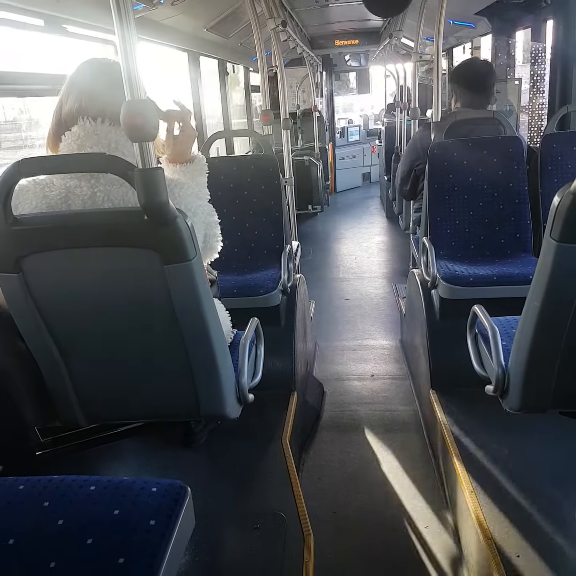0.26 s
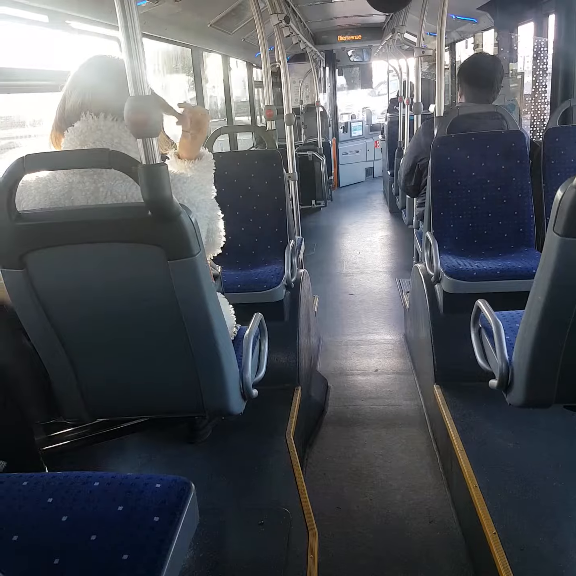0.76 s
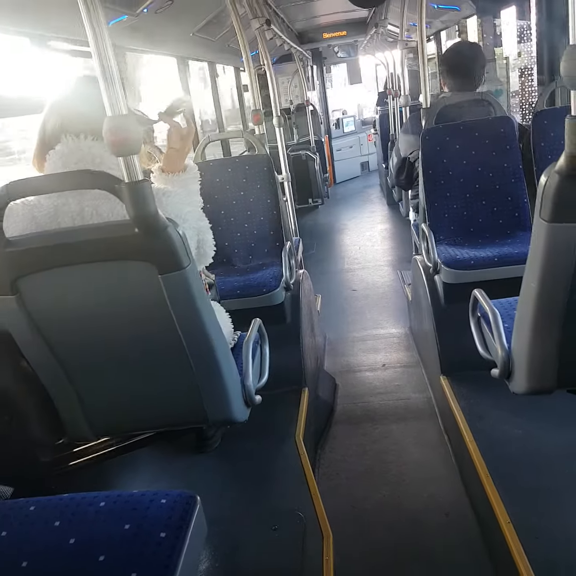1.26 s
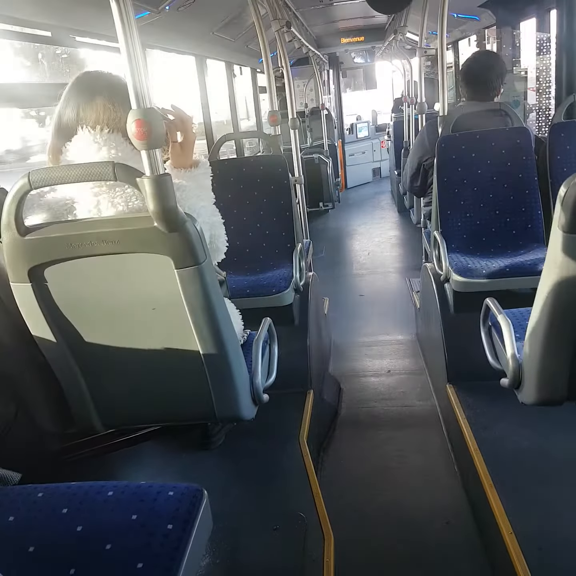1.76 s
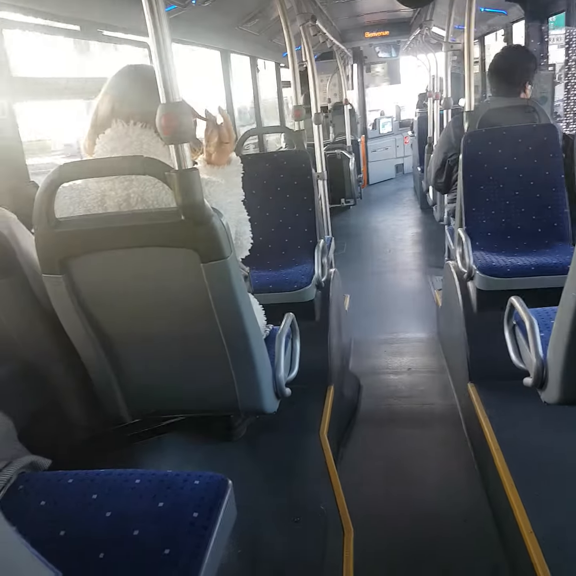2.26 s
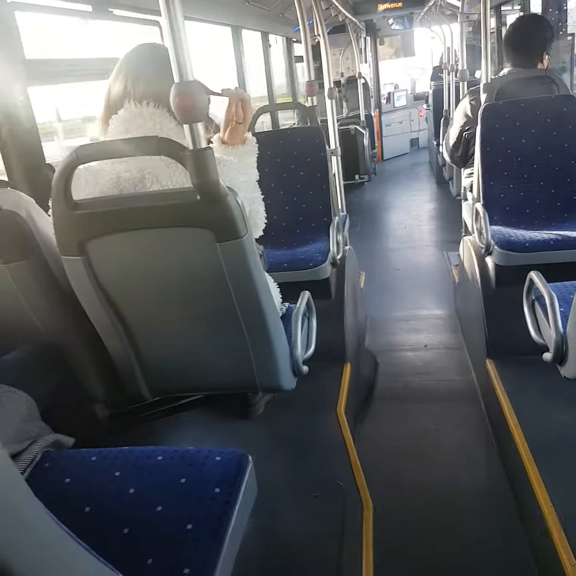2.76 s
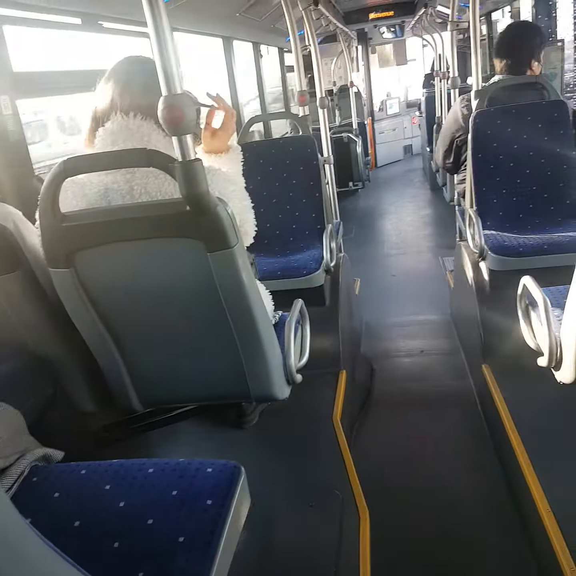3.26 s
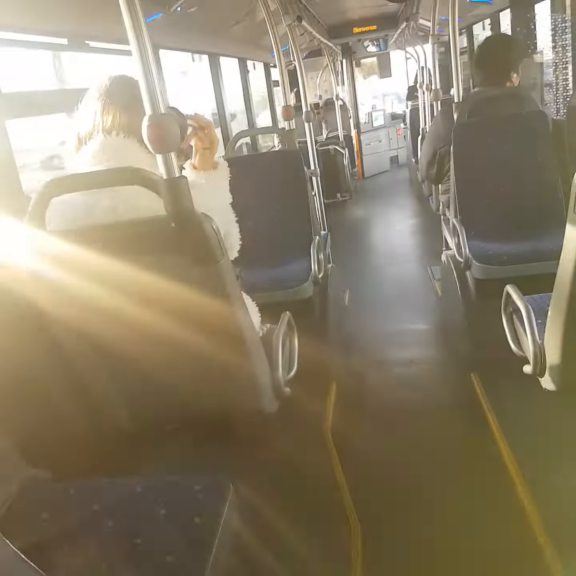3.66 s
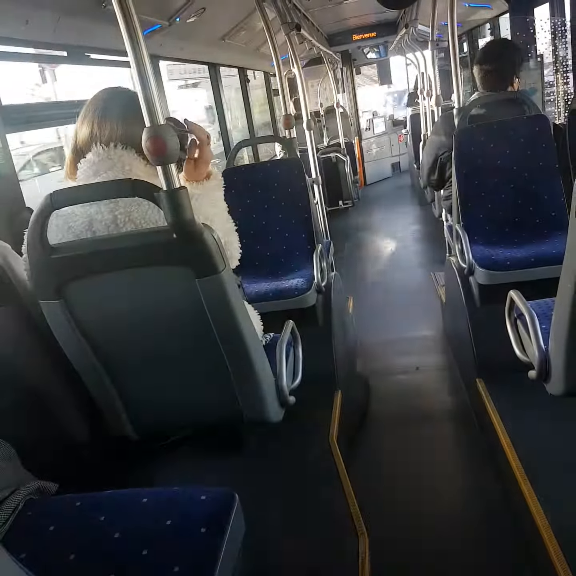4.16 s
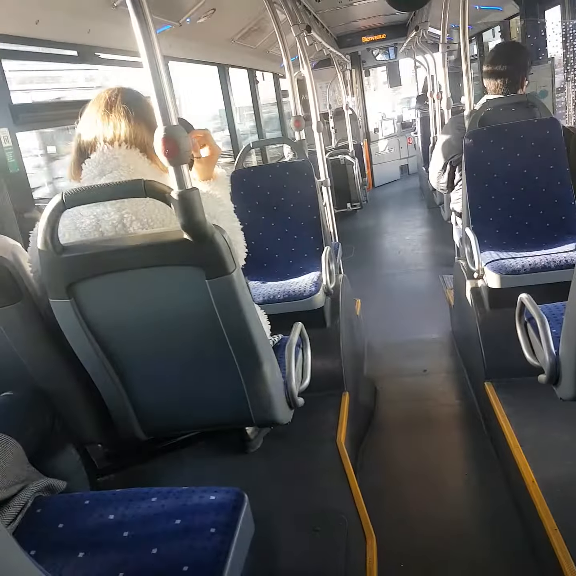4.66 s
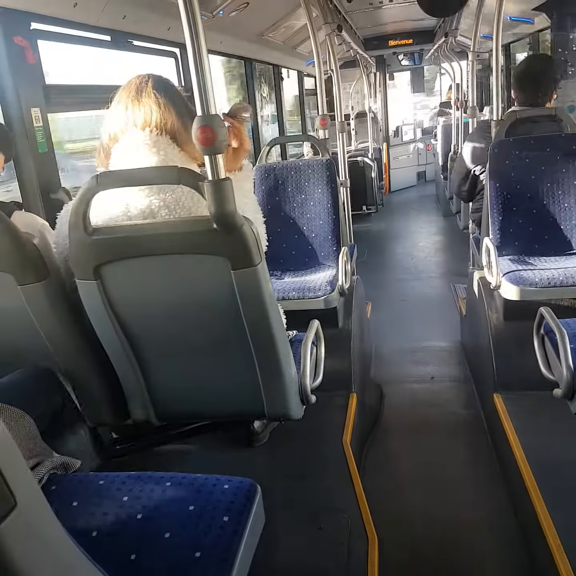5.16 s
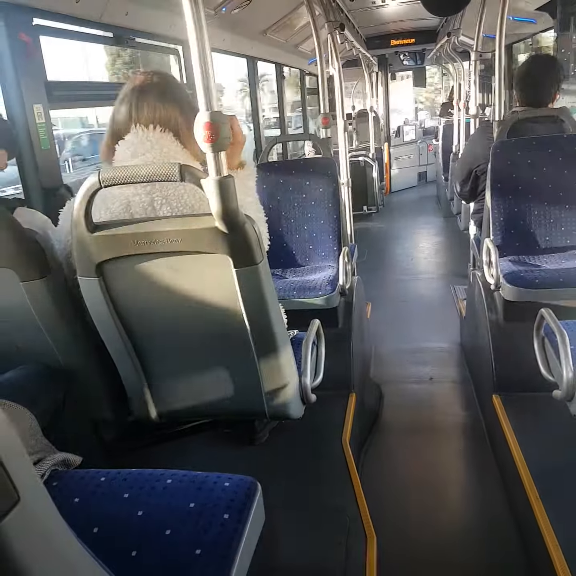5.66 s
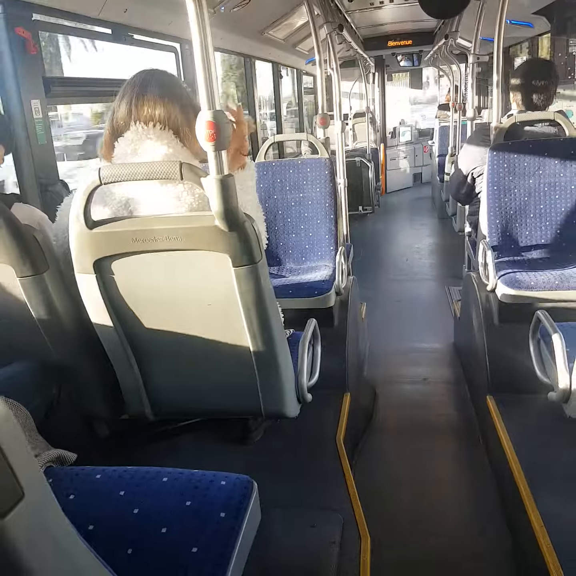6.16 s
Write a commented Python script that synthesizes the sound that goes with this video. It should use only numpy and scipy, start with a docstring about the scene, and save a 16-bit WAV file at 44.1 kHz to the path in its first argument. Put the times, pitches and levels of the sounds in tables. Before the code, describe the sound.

The rear interior of a moving city bus, heard from a passenger seat in wide stereo, with bass centred and somewhat stronger on the right. At 0 s a bright puff of hiss fades as the diesel eases off; a dull rattle follows near 0.4 s. From 0.8 to 1.4 s the engine almost coasts, leaving low gliding drones, road rumble and a string of light, dry rattles. Around 2.3 s fittings rattle again over a bump and the throttle opens; throbbing roar and clatter swell, pitch rising until 3.6 s. At about 3.7 s a gear change drops the pitch, lowest near 4 s, while the hum grows heavier. From 4.5 s the engine pulls hard and climbs steadily, with fuzzy gear whine, buzzing panels and faint air hiss. A tiny tick comes at 5 s, tyre rumble swells at 4.7 and 5.7 s, and it ends at 6.4 s still revving up.

```python
"""Rear of a city bus: the six-cylinder diesel picks up, drops back at a gear change, then pulls hard.
Crankshaft orders sweep through the cabin booms as sines; noise puffs and knocks at the firing rate make
roar and clatter through the ringing panels. Gear whine glides with the crankshaft; noise bands swell near
set engine speeds. Brief tones glide, noise bursts make a puff of hiss at the start and rattles of loose
fittings, and shaped noise makes road rumble and air hiss.
"""
import sys
import numpy as np
from scipy import signal
from scipy.fft import rfft, irfft, next_fast_len
from scipy.io import wavfile
from scipy.ndimage import map_coordinates

SR = 44100
rng = np.random.default_rng(int(sys.argv[2]) if len(sys.argv) > 2 else 0)


def int16_out(signal):
    """Quantize to a 16-bit WAV file."""
    q = np.round(np.clip(np.atleast_2d(signal).T, -1, 1) * 32767)
    wavfile.write(sys.argv[1], SR, q.astype(np.int16))


N = 283122

CRUISE_FIRING_HZ = 60  # reference speed of the level laws
FIRINGS_PER_TURN = 3
CLATTER_LAW = dict(coasting_db=-46, full_throttle_db=10.14, per_doubling_db=7.4)

# engine speed: (time [s], firing rate [Hz])
SPEED = [(0.0, 59.15), (0.75, 55.35), (2.2, 55.4), (3.0, 58.9), (3.3, 62.15), (3.6, 62.7), (3.8, 57.75),
         (4.05, 54.7), (4.45, 56.25), (5.0, 63.6), (5.6, 72.0), (6.42, 86.6)]
# combustion roar: (frequency [Hz], density [dB])
ROAR_SPECTRUM = [(60, -27.5), (110, 4.5), (160, 3.5), (240, 5.5), (330, -3), (430, -8), (700, -6.5),
                 (950, -9), (1300, -24.5), (3000, -56.5)]
# combustion clatter: (frequency [Hz], density [dB])
CLATTER_SPECTRUM = [(400, -31), (900, -3), (1200, 1), (1700, -4), (2300, -5.5), (3200, -14), (4300, -19.5),
                    (6000, -28.5), (7600, -34.5), (8500, -50), (16000, -77)]


def engine():
    """Hum, roar and clatter locked to one crankshaft and driven by one throttle."""
    firing_hz, = curves(SPEED)
    firings = np.cumsum(firing_hz) / SR
    orders = hum(firing_hz, firings, waver_db=1, waver_per_s=5, slip_rad=0.035)
    roar = combustion(firings, ROAR_SPECTRUM, knock_db=4, throb=0.25, flutter_db=0.7)
    clatter = combustion(firings, CLATTER_SPECTRUM, knock_db=-4.5, throb=0.11, flutter_db=0.45)
    roar_gain = effort(coasting_db=-35, full_throttle_db=9.4, per_doubling_db=6.9)
    return orders + roar_gain * roar + effort(**CLATTER_LAW) * clatter


# crankshaft orders: (multiple of crankshaft rate, relative level [dB])
ORDERS = [(3, 9), (4, 5.5), (4.5, 3), (5, -1), (5.5, 2), (6, 2), (6.5, 0), (7, -1), (7.5, 1), (8, -2),
          (9, 0), (10, -3), (10.5, 0), (11, -2), (12, 2), (13, 1), (14, -1), (15, 1), (18, 2), (20, 3)]
# cabin response to the hum: (frequency [Hz], gain [dB])
CABIN = [(35, 0), (55, -15), (70, -18), (83, -9.5), (94, -14.5), (102, -10), (112, -2.5), (124, -1),
         (138, -8), (155, -11), (200, -15), (226, -12.5), (243, -18), (262, -8.5), (290, -24), (319, -14),
         (345, -24), (378, -16.5), (410, -27), (490, -22)]
# cabin standing waves, one driving order each: (multiple, centre [Hz], width [Hz], gain [dB])
BOOMS = [(3, 58.5, 1.2, 4), (3, 74, 3.5, 6), (4, 104, 3, 8.5), (4, 113, 4, -13), (4.5, 106, 4, 10),
         (4.5, 123.5, 6.5, 11), (5, 123, 8, 14), (5.5, 121, 3.5, 4), (5.5, 108.5, 2.5, 7),
         (6, 140, 5.5, 15), (6, 110, 2.5, 6), (6.5, 122, 4, 4), (8, 228, 10, 7), (9, 191, 5, 6),
         (10, 262, 9, 7), (12, 220, 5, 6), (13, 257, 7, 3), (18, 488, 10, 6)]
SHIFT_S, SHIFT_TAKES_S, SHIFT_DB = 3.7, 0.16, 4
UNEVEN_DB = 6  # loss of the non-firing orders at zero throttle
SURGE_AT_CRUISE_DB, SURGES_PER_S = 1.6, 18


def hum(firing_hz, firings, waver_db, waver_per_s, slip_rad):
    """Orders swell through the cabin booms; the gear change loads the engine and the hum grows."""
    crank_hz, turns = firing_hz / FIRINGS_PER_TURN, firings / FIRINGS_PER_TURN
    throttle, = curves(THROTTLE)
    orders = np.zeros(N)
    for multiple, order_db in ORDERS:
        hz = multiple * crank_hz
        boom_db = peaks_db([boom for which, *boom in BOOMS if which == multiple], hz)
        level_db = order_db + along(CABIN, hz) + boom_db + waver_db * wobble(waver_per_s)
        # unequal cylinders make the orders between the firing harmonics
        if multiple % FIRINGS_PER_TURN:
            level_db = level_db - UNEVEN_DB * (1 - throttle) ** 2
        # reflections delay each order differently: pulses smear into a throbbing drone
        smear_rad = 1.3 * np.pi * multiple ** 2
        slip = slip_rad * multiple * wobble(waver_per_s)
        orders += amp(level_db) * np.sin(2 * np.pi * multiple * turns - smear_rad + slip)
    shifted = (1 + np.tanh((np.arange(N) / SR - SHIFT_S) / SHIFT_TAKES_S)) / 2
    # uneven at low speed, steadier as the engine climbs
    surge_db = SURGE_AT_CRUISE_DB * (CRUISE_FIRING_HZ / firing_hz) ** 2 * wobble(SURGES_PER_S)
    gain = effort(coasting_db=-35.3, full_throttle_db=5.7, per_doubling_db=9)
    gain = gain * amp(SHIFT_DB * shifted + surge_db)
    return np.sqrt(2) * gain * orders * sides(2 * firing_hz.mean())


# panel resonances and gaps between them: (centre [Hz], width [Hz], gain [dB])
PANELS = [(283.7, 19.4, -9.5), (310, 12, 7), (377, 5.6, 5), (493, 19, 2), (579.4, 22, 6), (811, 21, 3),
          (882, 16, 7.5), (1064, 49, -4), (1158, 36, 5), (1286, 15, 6.5), (1376, 18, 2), (1570, 30, 2.5),
          (1690, 53, 3.5)]


def combustion(firings, spectrum, knock_db, throb, flutter_db):
    """A puff of noise at each firing plus repeating knock, heard through the panels."""
    noise = rng.standard_normal((2, N))
    puffs = unit(noise * np.exp(throb * np.cos(2 * np.pi * firings)))
    source = puffs + amp(knock_db) * knocks(firings, scatter_db=0.5)

    def colour_db(hz):
        ripple_db = (hz > 1700) * standing_waves(hz, depth_db=1.3, spacing_hz=30)
        return along(spectrum, hz) + peaks_db(PANELS, hz) + ripple_db

    return amp(flutter_db * wobble(15)) * diffuse(source, colour_db)


def knocks(firings, scatter_db, count=6):
    """Cylinders fire in turn, each ringing the block through its own fixed response."""
    fired_at = np.flatnonzero(np.diff(np.floor(firings)) > 0)
    out = np.zeros((2, N))
    for cylinder in range(count):
        own = fired_at[cylinder::count]
        blows = np.zeros(N)
        blows[own] = amp(scatter_db * rng.standard_normal(len(own)))
        out += signal.oaconvolve(blows[None], cabin_tail(), axes=1)[:, :N]
    return unit(out)


# cabin decay: (frequency [Hz], t60 [s])
RING = [(200, 0.19), (1500, 0.25), (8000, 0.23)]


def cabin_tail():
    """Decaying noise as a stereo path through the cabin: reflections only, so it builds up first."""
    noise = rng.standard_normal((2, SR // 5))
    hz, t, bins = signal.stft(noise, SR, nperseg=256)
    build_up = 1 - np.exp(-t / 0.0086)
    decay = amp(-60 * t / along(RING, hz)[:, None])
    return signal.istft(bins * build_up * decay, SR, nperseg=256)[1]


# timing gear lines: (multiple of crankshaft rate, relative level [dB])
GEARS = [(40, -9), (62, -17), (73, -17)]
GEAR_FUZZ_PER_S = 13


def gear_whine():
    """Timing gears sing in fuzzy lines gliding with the crankshaft across the panel resonances."""
    crank_hz = curves(SPEED)[0] / FIRINGS_PER_TURN
    turns = np.cumsum(crank_hz) / SR
    out = np.zeros((2, N))
    for multiple, db in GEARS:
        hz = multiple * crank_hz
        fuzz = np.array([wobble(GEAR_FUZZ_PER_S) + 1j * wobble(GEAR_FUZZ_PER_S) for ear in range(2)])
        line = np.real(fuzz * np.exp(2j * np.pi * multiple * turns))
        out += amp(db + peaks_db(PANELS, hz)) * line * sides(hz.mean())
    return effort(**CLATTER_LAW) * out


# narrow rings and one broad hiss:
# (centre [Hz], width [Hz], firing rate at the swell [Hz], spread [Hz], level before effort [dB])
SPEED_BANDS = [(358, 21, 57.64, 1.97, -37), (685, 90, 55.4, 1.8, -42), (795, 120, 57.8, 0.38, -47),
               (317, 7.9, 57, 2, -39.5), (890, 49, 61.5, 1.3, -43), (1289, 20, 65.3, 6.5, -40.5),
               (1640, 55, 74.3, 10.5, -39.5), (3170, 380, 57, 3.4, -56.5), (479, 9.9, 81, 7.3, -38),
               (312, 6.3, 110, 8.9, -38.5)]


def speed_bands():
    """Noise bands that swell near set engine speeds: narrow rings and one broad hiss."""
    firing_hz, = curves(SPEED)
    out = np.zeros((2, N))
    for centre_hz, width_hz, swell_hz, spread_hz, db in SPEED_BANDS:
        def band_db(hz):
            return -20 * np.log10(1 + ((hz - centre_hz) / width_hz) ** 2)

        band = diffuse(rng.standard_normal((2, N)), band_db)
        nearness = np.exp(-((firing_hz - swell_hz) / spread_hz) ** 2)
        out += amp(db) * nearness * band
    return effort(coasting_db=-5.5, full_throttle_db=3.8, per_doubling_db=0.5) * out


# engine orders swelling, and other low drones and whines:
# (start [s], end [s], start pitch [Hz], end pitch [Hz], peak level [dB])
BRIEF_TONES = [(-.5, 0.85, 41, 37.2, -31), (-.3, 0.995, 180, 161.4, -29), (0.103, 1.004, 368, 367, -41.5),
               (0.395, .88, 111.5, 109.8, -28), (0.496, 1.493, 123.9, 159.5, -32),
               (0.894, 1.453, 27.08, 26.9, -23.5), (0.933, 1.25, 1316, 1314, -50.5),
               (1.543, 2.243, 166, 170, -34.5), (1.95, 2.6, 41.75, 47.7, -29),
               (1.896, 2.61, 229.2, 223, -34), (2.138, 2.552, 119.7, 123.9, -25.5),
               (2.283, 2.632, 162.5, 184.4, -24), (2.4, 2.75, 893, 885, -46), (3.85, 4.5, 178, 177.7, -33),
               (4.58, 4.92, 782, 776, -40)]


def brief_tones():
    """Brief gliding drones and whines: sines under half-sine envelopes."""
    t = np.arange(N) / SR
    out = np.zeros((2, N))
    for start_s, end_s, from_hz, to_hz, db in BRIEF_TONES:
        progress = np.clip((t - start_s) / (end_s - start_s), 0, 1)
        pitch_hz = from_hz + (to_hz - from_hz) * progress
        phase = 2 * np.pi * (np.cumsum(pitch_hz) / SR + rng.random())
        tone = np.sqrt(2) * np.sin(np.pi * progress) * np.sin(phase)
        out += amp(db) * sides(from_hz) * tone
    return out


# a bright puff of hiss at the start, then rattles of loose fittings:
# (time [s], level before the common +4.5 [dB], rise [s], t60 [s], tilt above 1 kHz [dB/octave])
BURSTS = [(-.03, -46, 0.017, 0.26, 4), (.385, -37, 0.03, 0.33, -7), (.767, -49, .003, 0.15, 0.5),
          (.96, -49.5, 0.014, 0.48, 2.5), (1.066, -46, 0.0026, 0.17, 6), (1.135, -49.5, 0.0024, 0.18, 5),
          (1.212, -48.5, 0.0061, 0.19, 2), (1.305, -48, 0.0073, 0.18, -1), (1.407, -52, .005, 0.24, 2.5),
          (2.268, -44.5, 0.0023, 0.2, 0.5), (2.333, -58, 0.0022, 0.11, 7), (2.493, -55, 0.0087, 0.22, 7)]
# burst noise: (frequency [Hz], density [dB])
BURST_SPECTRUM = [(100, -100), (700, -23), (1800, 11.5), (4000, 3.5), (7000, -4.5), (9000, -15),
                  (15000, -17)]
# small catch: (frequency [Hz], density [dB])
CATCH_SPECTRUM = [(2000, -19), (7500, -8), (9500, -5), (15000, -3)]


def puff_and_rattles():
    """Noise bursts, each with its own ring: a puff of hiss, rattles of loose fittings, a catch's tick."""
    chatter = rush(BURST_SPECTRUM) * amp(2.5 * wobble(200))
    out = np.zeros((2, N))
    for start_s, db, rise_s, t60_s, tilt_db in BURSTS:
        def response(hz):
            bright_db = tilt_db * np.log2(np.maximum(hz, 1000))
            return amp(bright_db + standing_waves(hz, depth_db=-2.0, spacing_hz=143))

        tone = unit(filtered(chatter, response))
        out += amp(db + 4.5) * burst(start_s, rise_s, t60_s) * tone
    catch = burst(4.9965, rise_s=0.0005, t60_s=0.1) * rush(CATCH_SPECTRUM)
    return out + amp(-47) * catch


def burst(start_s, rise_s, t60_s):
    """Burst envelope: a short direct snap, and its echo dying away in the cabin."""
    t = np.maximum(np.arange(N) / SR - start_s, 0)
    echo = amp(-60 * t / abs(t60_s))
    snap = amp(-8 - 60 * t / 0.025)  # dB against the echo, t60 in s
    return (1 - np.exp(-t / abs(rise_s))) * (echo + snap)


# bumps: (time [s], half length [s], body shake change [dB], tyre rumble change [dB])
BUMPS = [(1.2, 0.28, 1.5, 0), (2.38, 0.31, 2, 3), (4.672, 0.15, 1, 5), (5.729, 0.27, -4, 5)]
# body shake: (frequency [Hz], density [dB])
SHAKE_SPECTRUM = [(8, -25.5), (19, -1.5), (24, 7.5), (30, 4.5), (45, -19), (200, -62)]
# tyre rumble: (frequency [Hz], density [dB])
TYRE_SPECTRUM = [(15, -31.5), (35, -1), (70, 0), (115, 3.5), (200, -2), (280, -22.5), (450, -15.5),
                 (1500, -61.5)]
# air hiss: (frequency [Hz], density [dB])
HISS_SPECTRUM = [(3000, -7), (7000, 4.5), (9000, -12.5), (12500, -3), (13500, 5), (16000, -6)]
SHAKE_DB, TYRES_DB = -40, -27.5  # between bumps


def road():
    """Bumps change the shake of the body on its springs and the tyre rumble; air hisses faintly."""
    shake_change_db = sum(db * swell(s, half_s) for s, half_s, db, _ in BUMPS)
    tyre_change_db = sum(db * swell(s, half_s) for s, half_s, _, db in BUMPS)
    shake = amp(SHAKE_DB + shake_change_db) * rush(SHAKE_SPECTRUM)
    tyres = amp(TYRES_DB + tyre_change_db) * rush(TYRE_SPECTRUM)
    hiss_gain = effort(coasting_db=-79, full_throttle_db=4.8, per_doubling_db=0.5)
    hiss = hiss_gain * amp(0.5 * wobble(12)) * rush(HISS_SPECTRUM)
    return shake + tyres + hiss


def swell(s, half_length_s):
    """A bell-shaped rise and fall around s."""
    return np.exp(-((np.arange(N) / SR - s) / half_length_s) ** 2)


# driver's foot: (time [s], throttle [0 coasting, 1 full])
THROTTLE = [(0, 0.24), (.6, 0.17), (1, 0.0088), (1.75, 0.067), (2.3, 0.48), (2.6, 0.75), (3.2, 0.86),
            (3.6, 0.98), (3.9, 0.9), (4.4, 0.87), (5, 0.94), (5.4, 0.85), (6.42, 0.8)]


def effort(coasting_db, full_throttle_db, per_doubling_db):
    """Gain that grows with throttle and engine speed; coasting_db holds at cruise speed."""
    throttle_db = full_throttle_db * curves(THROTTLE)[0]
    speed_db = per_doubling_db * np.log2(curves(SPEED)[0] / CRUISE_FIRING_HZ)
    return amp(coasting_db + throttle_db + speed_db)


def rush(spectrum):
    """Stereo noise with the given spectrum."""
    return diffuse(rng.standard_normal((2, N)), lambda hz: along(spectrum, hz))


# left-right likeness: (frequency [Hz], correlation)
ALIKE = [(60, 0.98), (130, 1), (290, 0.83), (640, 0.6), (1410, -0.023), (3100, -0.025), (6820, -0.054),
         (15000, 0.11)]


def diffuse(pair, colour_db):
    """Two signals as a coloured cabin field: alike in the bass, unrelated in the treble; mid rms 1."""
    def response(hz):
        turn = np.arccos(np.clip(along(ALIKE, hz), -1, 1)) / 2
        blend = np.array([[np.cos(turn), np.sin(turn)], [np.cos(turn), -np.sin(turn)]])
        return amp(colour_db(hz)) * sides(hz)[:, None] * blend

    field = filtered(pair, response).sum(axis=1)
    return field / np.std(field.mean(axis=0))


# stereo lean: (frequency [Hz], left minus right [dB])
LEAN = [(30, -4), (60, -1), (99, -5.5), (160, -7.5), (270, -5), (450, -3.5), (740, -3), (1220, -6),
        (2010, -7), (3330, -6.5), (5500, -1.5), (9080, 2), (15000, -0.5)]


def sides(hz):
    """Left and right gains of the lean, at constant power."""
    gains = amp(np.outer([1, -1], along(LEAN, hz)) / 2)
    return gains / np.sqrt(np.mean(gains ** 2, axis=0))


def standing_waves(hz, depth_db, spacing_hz):
    """Dense modes make the response ripple at random, in dB."""
    return depth_db * map_coordinates(rng.standard_normal(1024), [hz / spacing_hz], mode="wrap")


def peaks_db(rows, hz):
    """Summed gain of bell-shaped (centre [Hz], width [Hz], gain [dB]) resonances."""
    return sum(db * np.exp(-((hz - centre) / width) ** 2) for centre, width, db in rows)


def filtered(x, response):
    """x through a response of frequency, with mirrored ends."""
    edge = 4096
    x = np.pad(x, [(0, 0)] * (x.ndim - 1) + [(edge, edge)], "reflect")
    size = next_fast_len(x.shape[-1], real=True)
    spectrum = rfft(x, size) * response(np.fft.rfftfreq(size, 1 / SR))
    return irfft(spectrum, size)[..., edge:edge + N]


def wobble(knots_per_s):
    """A smooth random curve through unit-variance knots."""
    coarse = np.arange(0, N + 64, 64)
    knots = rng.standard_normal(1024)
    curve = map_coordinates(knots, [coarse * knots_per_s / SR], mode="wrap")
    return np.interp(np.arange(N), coarse, curve)


def curves(rows):
    """One value per sample for each column after the time."""
    s, *columns = np.transpose(rows)
    return [np.interp(np.arange(N) / SR, s, column) for column in columns]


def along(points, hz):
    """(frequency [Hz], value) points read on a log axis."""
    f, v = np.transpose(points)
    return np.interp(np.log(hz + 1), np.log(f + 1), v)


def unit(x):
    """Scaled to rms 1."""
    return x / np.sqrt(np.mean(x ** 2) + 1e-20)


def amp(db):
    """Decibels to gain."""
    return 10 ** (np.asarray(db) / 20)


def scene():
    """All layers together, from the engine to the road."""
    return engine() + gear_whine() + speed_bands() + brief_tones() + puff_and_rattles() + road()


CEILING, TOP_HZ = 0.95, 15750


def record(dry):
    """Rounds peaks off below the ceiling, cuts the treble above TOP_HZ and fades both ends."""
    rounded = dry / (1 + np.abs(dry / CEILING) ** 10) ** 0.1
    lowpass = signal.ellip(10, 0.1, 60, TOP_HZ, fs=SR, output="sos")
    return signal.sosfiltfilt(lowpass, rounded) * signal.windows.tukey(N, 0.0015)


dry = scene()
out = record(dry)
int16_out(out)
```